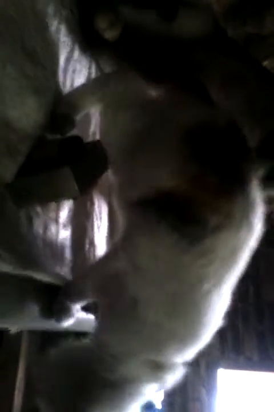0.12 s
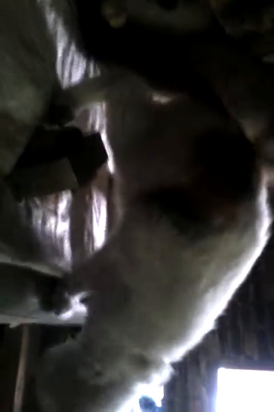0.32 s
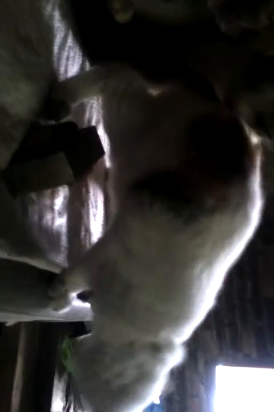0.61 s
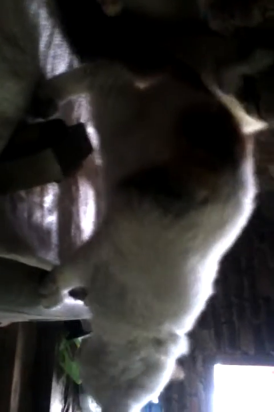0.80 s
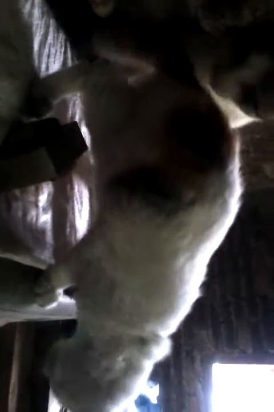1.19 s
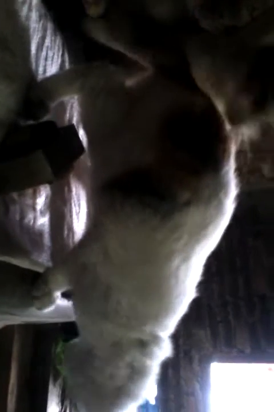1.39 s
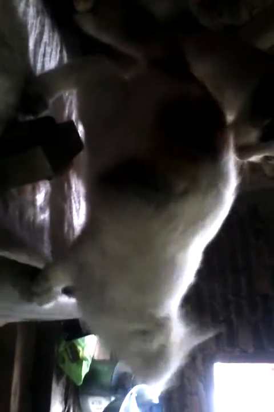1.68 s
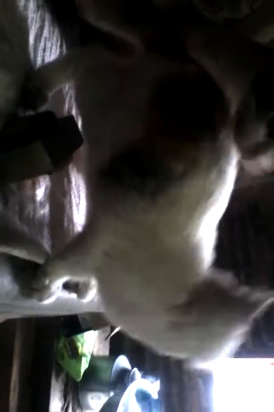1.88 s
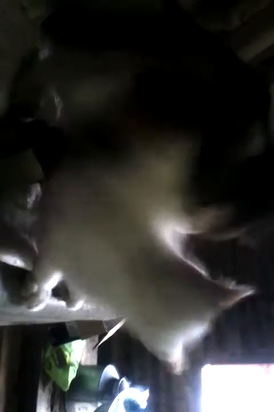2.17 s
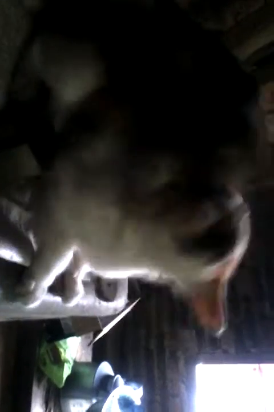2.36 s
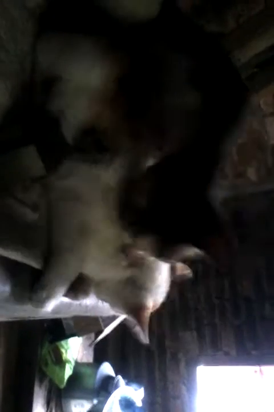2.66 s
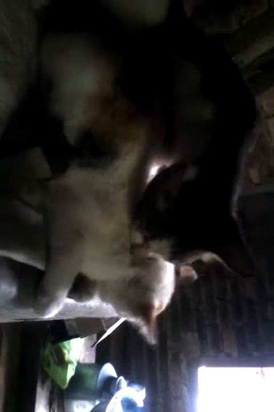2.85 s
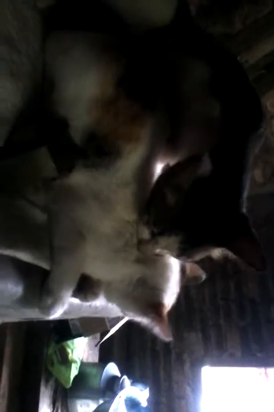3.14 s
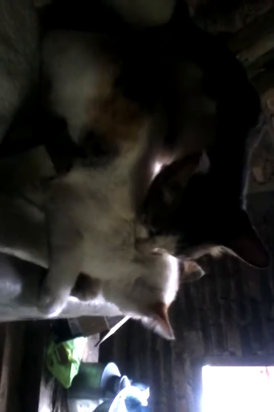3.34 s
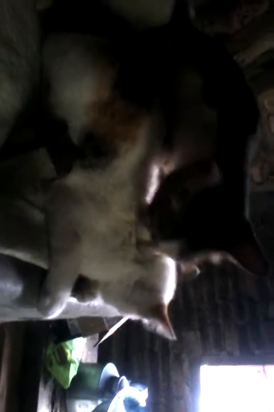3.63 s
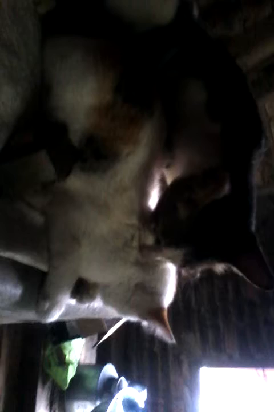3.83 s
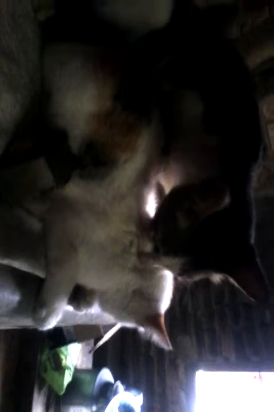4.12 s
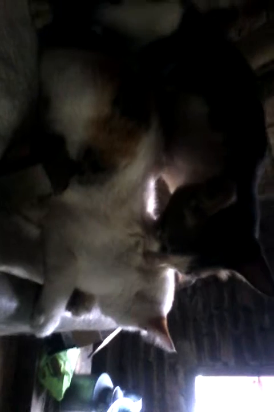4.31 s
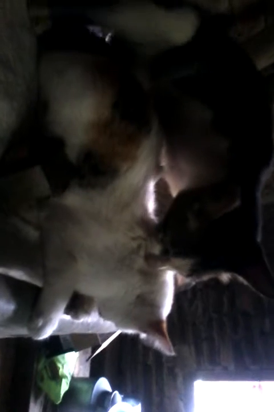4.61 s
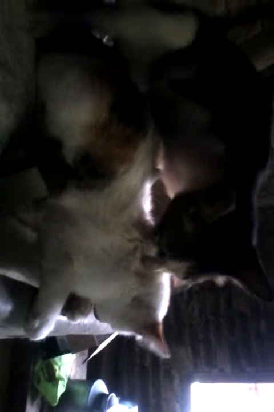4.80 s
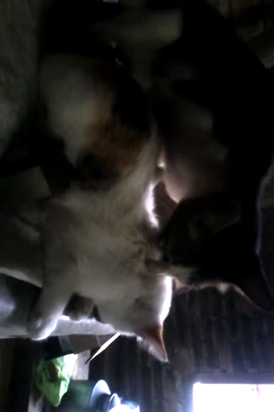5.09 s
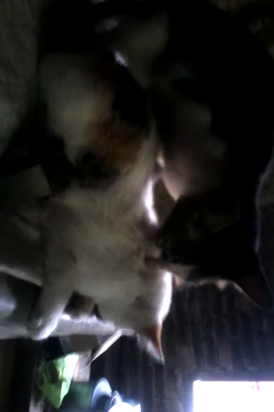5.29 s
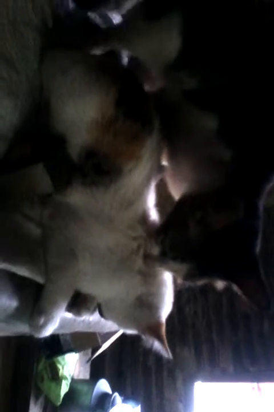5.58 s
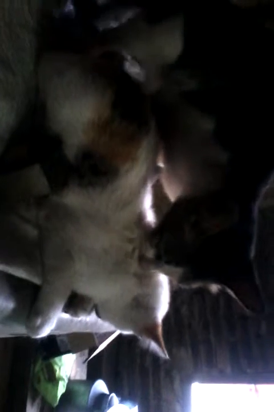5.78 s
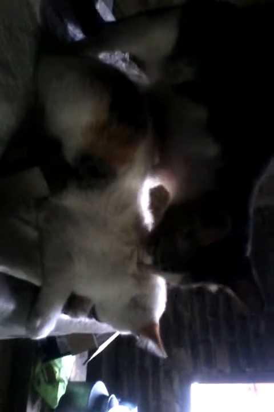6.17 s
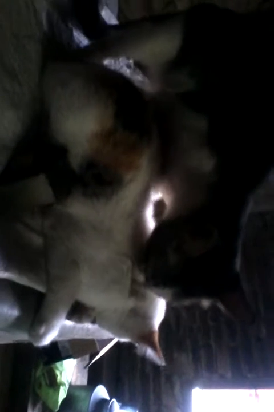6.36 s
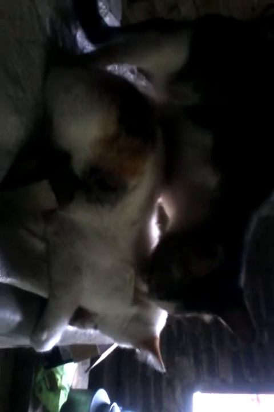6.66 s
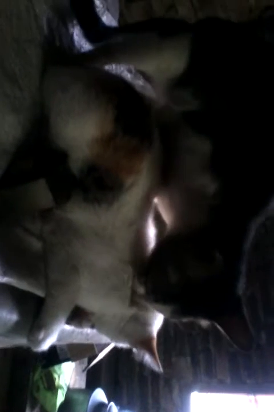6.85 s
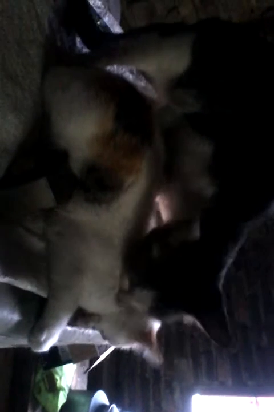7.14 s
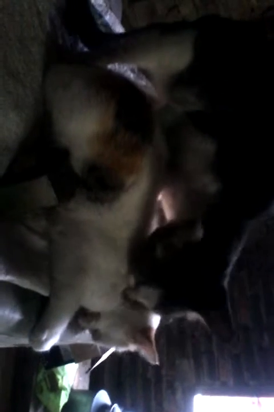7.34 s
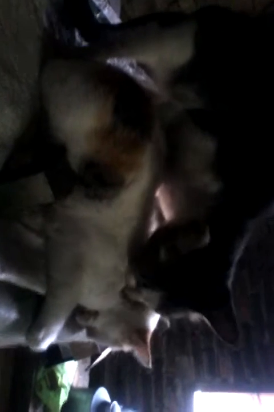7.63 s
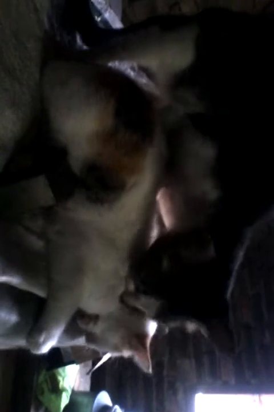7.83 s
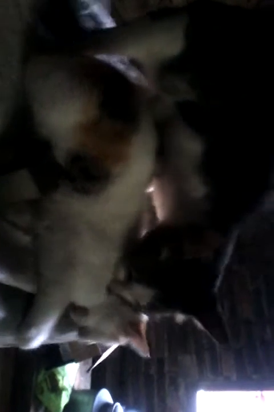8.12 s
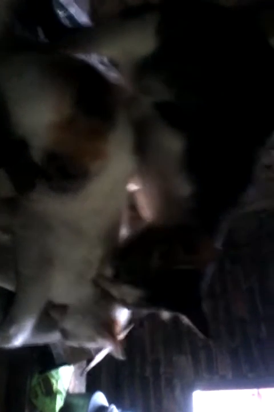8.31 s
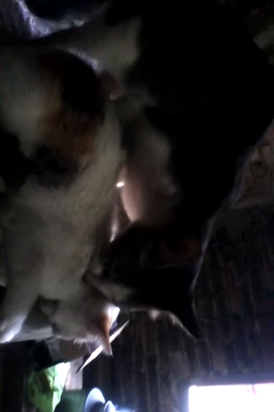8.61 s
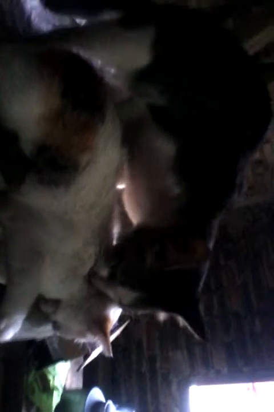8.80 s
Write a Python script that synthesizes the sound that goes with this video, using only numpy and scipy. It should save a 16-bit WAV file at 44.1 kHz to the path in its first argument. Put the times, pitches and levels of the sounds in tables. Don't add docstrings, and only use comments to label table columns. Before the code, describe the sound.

Two cats in a small hard room, close to a phone. A quiet hummed whine swells abruptly into two loud, nasal, wavering screams, over within two seconds. A breathy spit and thin whines follow, then long near-silence with small claw ticks, one soft falling mew, faint glides and a low moan, over low hum and hiss. Dull, narrow-band sound.

```python
import sys
import numpy as np
from scipy import signal
from scipy.fft import rfft, irfft
from scipy.io import wavfile
from scipy.ndimage import uniform_filter1d

SR = 44100
rng = np.random.default_rng(int(sys.argv[2]) if len(sys.argv) > 2 else 0)


def natural_amplitude(level_db):
    exponent = np.asarray(level_db, float) / 20
    return 10 ** exponent


def generate_wav(sig):
    pcm = np.round(np.clip(np.atleast_2d(sig).T, -1, 1) * 32767).astype(np.int16)
    wavfile.write(sys.argv[1], SR, pcm)


N = 395136

# time_s, pitch_hz, effort_db, gape_hz (mouth resonance), nose_db (fundamental)
YOWL_PHRASES = [
    [(.4, 307.5, -74, 1850, -66), (.458, 335.5, -68, 1650, -59), (.578, 368, -67, 1570, -46),
     (.588, 371, -54, 1486, -37), (.7, 387, -47, 1470, -39.5), (.8, 391.8, -45, 1580, -35.5),
     (.85, 402, -44, 1572, -41)],
    [(.862, 391, -28, 1583, -28.5), (.9, 419.4, -31.5, 1623, -33.5), (1.022, 471.3, -21, 2042, -34.5),
     (1.062, 473.5, -11, 2328, -48.5), (1.1, 449.8, -15.5, 2088, -44.5), (1.154, 416, -20.5, 1850, -37.5),
     (1.2, 416.6, -16.5, 2021, -40), (1.25, 420.7, -25, 2066, -87)],
    [(1.27, 462.5, -26, 2040, -75), (1.354, 485, -18, 2354, -97), (1.476, 514.6, -17, 2108, -55),
     (1.502, 516.5, -11.5, 2167, -38.5), (1.524, 489, -16, 2148, -47), (1.56, 437.2, -18, 2337, -42.5),
     (1.62, 408, -29.5, 2406, -27.5), (1.66, 426, -65, 2297, -90)],
]
# time_s, swell_db
BREATH_SURGES = [(.59, 7), (.605, -7), (.617, 9.5), (.65, 6.5), (.866, -5.5), (.93, 1.5), (1.036, 2.5),
                 (1.046, -2.5), (1.056, 2.5), (1.066, 7.5), (1.074, -3), (1.082, 5.5), (1.11, 1),
                 (1.181, 0.5), (1.257, 5), (1.37, 2), (1.416, 1.5), (1.46, -8), (1.503, 2), (1.53, -2.5),
                 (1.545, 1)]
# time_s, roughness (0-1)
YOWL_ROUGHNESS = [(.4, .25), (.7, .3), (.75, .12), (1.2, .09), (1.26, .18), (1.33, .11), (1.5, .12),
                  (1.56, .26)]
# time_s, cavity_hz
TONGUE_MOVES = [(.6, 3950), (.86, 3780), (1.06, 3750), (1.13, 4236), (1.25, 3770), (1.5, 4480),
                (1.62, 3800)]
# centre_hz, gain_db
THROAT_POCKETS = [(2800, 0), (3350, -12), (3800, -1), (4800, -2), (5250, -13), (5900, 0)]
# peak_s, peak_db, centre_hz, rise_s, fall_s
SPIT_PUFFS = [(0.59, -80, 613, 0.00243, 0.1), (1.719, -57.5, 2030, .078, 0.038),
              (1.781, -56, 3226, 0.051, 0.045), (2.309, -56, 490.5, .023, 0.049),
              (2.322, -41.5, 1553, 0.019, 0.032), (2.345, -52.5, 2830, 0.027, 0.028),
              (3.25, -64, 304, 0.11, 0.081), (4.021, -73.5, 1796, 0.11, 0.093),
              (4.666, -82, 504, 0.00307, 0.038), (5.112, -63.5, 2603, 0.0022, 0.0061),
              (5.121, -61.5, 547, .19, 0.089), (5.23, -68, 540, 0.046, 0.033),
              (5.911, -69, 592.4, 0.011, 0.00774), (6.03, -61.5, 354, 0.069, 0.11),
              (7.13, -63, 446, 0.062, .04), (7.29, -67, 2520, 0.0019, .0043),
              (7.744, -67, 593.4, 0.0077, 0.012), (7.8, -58.5, 347, .04, 0.088),
              (8.11, -72.5, 745.4, 0.017, 0.024), (8.946, -66, 719, 0.01, 0.048)]
# start_s, peak_db, ring_hz
CLAW_TICKS = [
    (3.515, -44, 3020),
    (3.905, -34.5, 3940),
    (5.1113, -50, 1759),
    (5.2235, -51, 2270),
    (5.9965, -50.5, 6470),
]
# time_s, pitch_hz, level_db, overtones_db
LONG_MEWS = [
    [(3.78, 618, -75, -13), (3.86, 639, -68, -20), (4.156, 601.3, -73.5, -20), (4.276, 570.5, -58, 2.5),
     (4.344, 566, -66.5, 27.5), (4.385, 524, -54, 2), (4.42, 495, -77.5, 19), (4.576, 507, -66.5, 9.5),
     (4.655, 480.6, -67, 14)],
    [(4.657, 491, -57.5, 24), (4.68, 478.4, -44.5, 11), (4.811, 452.6, -44.5, -4.5),
     (4.985, 363.5, -57.5, 7.5), (5.103, 319.2, -48, 0), (5.16, 247.3, -49, -3.5), (5.19, 225, -55, 6),
     (5.3, 213, -84, 11.5)],
    [(6.4, 266.7, -98, 12), (6.448, 260.3, -68.5, 17.5), (6.492, 266, -78.5, 18), (6.546, 272.2, -76, 22.5),
     (6.67, 261.9, -81, 21.5), (6.7, 287.3, -81, 17), (6.842, 291, -87, 24), (6.936, 248.2, -84, 21),
     (7.0, 248.2, -77.5, 21.5)],
]
# start_s, length_s, from_hz, to_hz, level_db
NASAL_GLIDES = [
    (5.922, .29, 237, 541, -54),
    (6.2, 0.34, 502, 520, -69),
    (7.001, .17, 499.5, 353.4, -54),
]
# start_s, length_s, from_hz, to_hz, level_db
LOW_MURMURS = [
    (3.38, 0.11, 264.7, 310, -70),
    (3.47, 0.091, 400, 447.5, -75.5),
    (3.571, 0.184, 192.8, 228.7, -73.5),
    (7.75, 0.35, 204.2, 560.6, -64),
]
# partial_hz, gain_db
SHUT_MUZZLE = [(200, -5.5), (300, 3), (390, -7.5), (540, -1), (870, 5), (1100, -14), (1480, -18.5),
               (1900, -48)]
# start_s, length_s, pitch_hz, level_db,
# roughness (0-1)
THIN_WHINES = [(1.62, 0.28, 896, -47.5, 0.42), (1.95, 0.2, 548, -63, 0.27), (2.076, 0.066, 890, -59.5, .6),
               (2.121, 0.048, 907, -51.5, 0.54), (2.354, 0.16, 430.5, -65.5, 0.13),
               (2.42, 0.28, 1083, -73, 0.06), (2.451, 0.4, 646, -71.5, 0.04),
               (2.743, 0.18, 1075, -69.5, 0.16), (2.982, 0.13, 1073, -66.5, 0.15),
               (3.24, 0.14, 462, -71, 0.02), (3.809, .1, 935, -69, 0.25), (3.919, .12, 1579, -64.5, 0.5),
               (3.962, 0.147, 918, -62, 0.14), (5.759, 0.19, 675.6, -71.5, 0.58),
               (6.568, 0.26, 917, -67.5, 0.28), (6.9, .11, 490.9, -71, 0.08),
               (7.119, 0.72, 244.5, -73, 0.22), (7.18, 0.56, 494, -79.5, 0.3), (8.048, .11, 748, -67, .4),
               (8.254, .1, 560.4, -71.5, 0.41), (8.333, 0.37, 693, -79, 0.34)]
HUM_PITCHES = (133.4, 158.3)
HUM_LEVELS = (-78.5, -83.5)
# peak_s, level_db, rise_s, fall_s
HUM_SWELLS = [
    [(0, -78.5, 0.2, 1.5), (1.1, -51.5, 0.17, .3), (8.48, -70, 0.22, .3)],
    [(0, -66.5, 0.089, .2), (.62, -58, 0.049, .08), (1.05, -42, 0.052, .12), (1.3, -53, 0.088, .35),
     (2.2, -79, 0.17, .6)],
]
# frequency_hz, level_db (per hertz)
ROOM_SPECTRUM = [(35, -51), (60, -19.5), (105, -3.5), (143, -0.5), (241, 2), (328, -4.5), (439, -3),
                 (1430, -14.5), (5980, -19), (6910, -19.5), (8500, -33), (11000, -71.5), (18700, -120)]
# peak_s, level_db, rise_s, fall_s
AIR_SWELLS = [(0, -74, 0.098, 0.26), (0.598, -61, 0.015, .14), (1.7, -57, 0.55, 0.068),
              (2.498, -71.5, 0.61, 0.284), (4.678, -61.5, 0.01193, 0.082), (4.999, -75, 0.12, 0.18)]


def yowl():
    start, t, (hz, mouth_db, mouth_hz, chest_db), ends = read(np.vstack(YOWL_PHRASES))
    ceiling_db = -30.5 + .15 * (chest_db + 40)
    lagged_db = np.interp(t - .043, t, mouth_db)
    effort_db = np.minimum(lagged_db, mouth_db) + 3
    throat_db = 3 - 20 * np.log10(natural_amplitude(-ceiling_db) + natural_amplitude(-effort_db))

    over_scream_db = mouth_db + 19
    palate_db = np.maximum(-35.5 + 1.7 * over_scream_db, mouth_db - 28)
    lips_shut_db = 40 / (1 + np.exp((mouth_hz - 1796) / 12))
    teeth_db = -39 + 2 * over_scream_db - lips_shut_db
    palate_hz = np.interp(t, *np.transpose(TONGUE_MOVES))

    surge_db = sum(db * puff(t, s, rise=.005, fall=.005) for s, db in BREATH_SURGES)
    surge_db = surge_db + .8 * walk(len(t), rate=40)
    surge_db += 1.1 * (t < .72) * walk(len(t), rate=69)

    hz = hz * (1 + .007 * walk(len(t), rate=45))
    f = np.arange(1, 19)[:, None] * hz
    gain = natural_amplitude(throat_db + .3 * surge_db) * share(resonance(f, 900, 300) ** 2)
    mouth = resonance(f, mouth_hz, 300 + 1.4 * np.abs(mouth_hz - 1500)) ** 3
    mouth += natural_amplitude(-17) * resonance(f, 1700, 290) ** 2
    mouth += natural_amplitude(-26.5) * resonance(f, 2850, 400) ** 2
    narrow = np.clip((1750 - mouth_hz) / 150, 0, 1)
    side_peaks = resonance(f, 2200, 600) ** 2 + 1.2 * resonance(f, 1150, 300) ** 2
    mouth += natural_amplitude(-18.5) * narrow * side_peaks
    gain += natural_amplitude(mouth_db + surge_db) * share(mouth)
    gain[0] = natural_amplitude(chest_db)
    gain *= natural_amplitude([(.8 + .6 * max(k - 5, 0)) * walk(len(t), rate=28) for k in range(len(f))])

    rough = np.interp(t, *np.transpose(YOWL_ROUGHNESS))
    breath = rough * natural_amplitude(mouth_db + surge_db + .5) * rush(t, mouth_hz, rate=1900)
    teeth_hz = 6455 + 0 * t
    for peak_hz, width_hz, level_db in [(palate_hz, 650, palate_db), (teeth_hz, 950, teeth_db)]:
        cavity = natural_amplitude(level_db + 1.2 * surge_db - .5 + 4.2 * walk(len(t), rate=34))
        gain += cavity * share(resonance(f, peak_hz, width_hz) ** 3)
        breath = breath + cavity * natural_amplitude(-4.5) * rush(t, peak_hz, rate=8.5 * width_hz)

    voice = np.sum(gain * folds(hz, rough, count=18), axis=0)
    out = np.zeros(N)
    out[start:start + len(t)] = (voice + breath) * ends
    return colour(out, THROAT_POCKETS)


def spits():
    t, out = np.arange(N) / SR, np.zeros(N)
    for s, db, hz, rise, fall in SPIT_PUFFS:
        width_hz = min(hz, 520) + 9 / fall
        air = unit(band(rng.standard_normal(N), max(hz - width_hz / 2, 50), hz + width_hz / 2))
        out += natural_amplitude(db + 1.3 * walk(N, rate=100)) * puff(t, s, rise, fall) * air
    return out


def claws():
    out, ring = np.zeros(N), np.arange(2000) / SR
    for s, db, hz in CLAW_TICKS:
        i = int(s * SR)
        tick = unit(band(rng.standard_normal(len(ring)), .98 * hz, 1.1 * hz))
        crack = unit(band(rng.standard_normal(len(ring)), hz, min(2 * hz, 9000)))
        strike = puff(ring, .0032, rise=.00068, fall=.0022) + natural_amplitude(-11) * np.exp(-ring / .013)
        snap = natural_amplitude(-21) * puff(ring, .0013, rise=.0007, fall=.001)
        out[i:i + len(ring)] += natural_amplitude(db - 12) * (strike * tick + snap * crack)
    return out


def mews():
    out, k = np.zeros(N), np.arange(4)[:, None]
    glides = [arch(*row, -3.5) for row in NASAL_GLIDES]
    glides += [arch(*row, 10) for row in LOW_MURMURS]
    muzzle_hz, muzzle_db = np.transpose(SHUT_MUZZLE)
    for table, creak in [(m, .75) for m in LONG_MEWS] + [(g, .5) for g in glides]:
        start, t, (hz, db, tones_db), ends = read(table)
        rough = .06 + creak * np.clip((440 - hz) / 500, 0, .3)
        f = (k + 1) * hz
        parted_db = .88 * (db + 52.5) * np.clip((f - 1000) / 400, 0, 1)
        db = db + parted_db + tones_db * (k > 0) - 4 * k
        db = db + np.interp(np.log(f), np.log(muzzle_hz), muzzle_db)
        flutter_db = np.array([8 * rough * walk(len(t), rate=40) + 2.5 * walk(len(t), rate=22) for _ in k])
        voice = np.sum(natural_amplitude(db + flutter_db) * folds(hz, rough, count=4), axis=0)
        out[start:start + len(t)] += ends * voice
    return out


def whines():
    out = np.zeros(N)
    for s, length, pitch_hz, level_db, rough in THIN_WHINES:
        start, t, (hz, db), ends = read(arch(s, length, pitch_hz, pitch_hz, level_db))
        level = natural_amplitude(db + 8 * rough * walk(len(t), rate=40))
        out[start:start + len(t)] += ends * level * folds(hz, np.clip(rough, 0, 1), count=1)[0]
    return out


def hums():
    t, out = np.arange(N) / SR, np.zeros(N)
    for hz, db, rows in zip(HUM_PITCHES, HUM_LEVELS, HUM_SWELLS):
        out += swell(t, db, rows) * folds(hz + 0 * t, .28, count=1)[0]
    return out


def room_noise():
    t = np.arange(N) / SR
    air_db = -71
    air = swell(t, air_db - 2.5, AIR_SWELLS)
    low_pass = signal.butter(2, 1200, fs=SR, output="sos")
    high_pass = signal.butter(2, 1200, "high", fs=SR, output="sos")
    low = signal.sosfilt(low_pass, colour(rng.standard_normal(N), ROOM_SPECTRUM))
    hiss = signal.sosfilt(high_pass, colour(rng.standard_normal(N), ROOM_SPECTRUM))
    low *= air * natural_amplitude(1.3 * walk(N, rate=10)) / np.std(band(low, 190, 500, order=4))
    hiss *= natural_amplitude(-78.5) * (air / natural_amplitude(air_db)) ** .6 / np.std(band(hiss, 4800, 7400, order=4))
    whistle = natural_amplitude(-89.5) * np.sin(2 * np.pi * 3120 * t)
    return low + hiss + whistle


def folds(hz, rough, count):
    k = np.arange(1, count + 1)[:, None]
    jitter = 1 + .05 * rough * walk(len(hz), rate=90)
    phase = 2 * np.pi * np.cumsum(hz * jitter) / SR
    noisy = np.clip(rough * (.9 + .2 * k), 0, 1)
    shimmer = 1 - noisy + noisy * np.array([walk(len(hz), rate=240) for _ in k])
    partials = np.sin(k * phase - .03 * k ** 2)
    return np.sqrt(2) * shimmer * partials / np.hypot(1 - noisy, noisy)


def rush(t, hz, rate):
    low_pass = signal.butter(3, rate / 5, fs=SR, output="sos")
    turbulence = signal.sosfilt(low_pass, rng.standard_normal(len(t)))
    return np.sqrt(2) * unit(turbulence) * np.cos(2 * np.pi * np.cumsum(hz) / SR)


def resonance(f, hz, width):
    return 1 / np.sqrt(1 + (2 * (f - hz) / width) ** 2)


def share(gain):
    return gain / np.sqrt(np.sum(gain ** 2, axis=0))


def read(table):
    s, *columns = np.transpose(table)
    start = int(s[0] * SR)
    t = np.arange(start, min(int(s[-1] * SR), N)) / SR
    ends = np.clip(np.minimum(t - s[0], s[-1] - t) / .0024, 0, 1)
    return start, t, [np.interp(t, s, c) for c in columns], ends


def arch(s, length, from_hz, to_hz, db, *rest):
    shape = [(0, -6.5), (.15, -2.5), (.7, -.5), (1, -13)]  # (share of length, dB)
    return [(s + u * length, from_hz + u * (to_hz - from_hz), db + drop_db, *rest) for u, drop_db in shape]


def puff(t, s, rise, fall):
    return np.exp(-.5 * ((t - s) / np.where(t < s, rise, fall)) ** 2)


def swell(t, db, rows):
    return natural_amplitude(db) + sum(natural_amplitude(top_db) * puff(t, s, rise, fall) for s, top_db, rise, fall in rows)


def walk(size, rate):
    k = int(SR / rate)
    return unit(uniform_filter1d(uniform_filter1d(rng.standard_normal(size), k), k))


def unit(x):
    return x / np.sqrt(np.mean(x ** 2))


def band(x, lo_hz, hi_hz, order=2):
    return signal.sosfilt(signal.butter(order, [lo_hz, hi_hz], "bandpass", fs=SR, output="sos"), x)


def colour(x, points):
    hz, db = np.transpose(points)
    f = np.fft.rfftfreq(len(x), 1 / SR) + 1
    return irfft(rfft(x) * natural_amplitude(np.interp(np.log(f), np.log(hz), db)), len(x))


def room(x, t60, db):
    t = np.arange(SR // 2) / SR
    tail = band(rng.standard_normal(len(t)), 180, 3500, order=1) * natural_amplitude(-60 * t / t60) * (t > .004)
    return x + natural_amplitude(db) * signal.fftconvolve(x, tail / np.sqrt(np.sum(tail ** 2)))[:N]


def scene():
    near = room(yowl() + spits() + claws(), t60=.1, db=-20)
    far = room(mews() + whines(), t60=.29, db=-16)
    return (near + far + hums() + room_noise())[None]


def starve(x, size=2048, count=16):
    spec = signal.stft(x, nperseg=size)[2]
    power = np.abs(spec[:size // 2]).reshape(-1, count, spec.shape[1]) ** 2
    band_db = 10 * np.log10(power.mean(axis=1) + 1e-18)
    margin_db = band_db - band_db.max(axis=0) + 53.5
    margin_db -= .2 * np.arange(len(band_db))[:, None]
    margin_db += 3 * rng.standard_normal(band_db.shape)
    spec[:size // 2] *= np.repeat(1 / (1 + natural_amplitude(-4 * margin_db)), count, axis=0)
    return signal.istft(spec, nperseg=size)[1][:len(x)]


def top_cut(x):
    return signal.sosfilt(signal.butter(12, 9580, fs=SR, output="sos"), x)


def record(dry):
    x = .92 * np.tanh(dry / .92)
    x = signal.sosfilt(signal.butter(3, 90, "high", fs=SR, output="sos"), x)
    x = signal.sosfilt(signal.ellip(8, .3, 60, 7250, fs=SR, output="sos"), x)
    first_rate_hz = 16000
    mirror = x * np.cos(2 * np.pi * first_rate_hz * np.arange(N) / SR)
    mirror = band(mirror, 8500, 9750, order=4)
    mirror_power = uniform_filter1d(mirror ** 2, size=1500) + 1e-18
    mirror /= 1 + (natural_amplitude(-52) ** 2 / mirror_power) ** 2
    x = starve((x + natural_amplitude(-14) * mirror)[0])[None]
    rumble = natural_amplitude(-94) * unit(band(rng.standard_normal(N), 15, 60))
    return top_cut(np.clip(x + rumble, -1, 1))


dry = scene()
out = record(dry)
generate_wav(out)
```